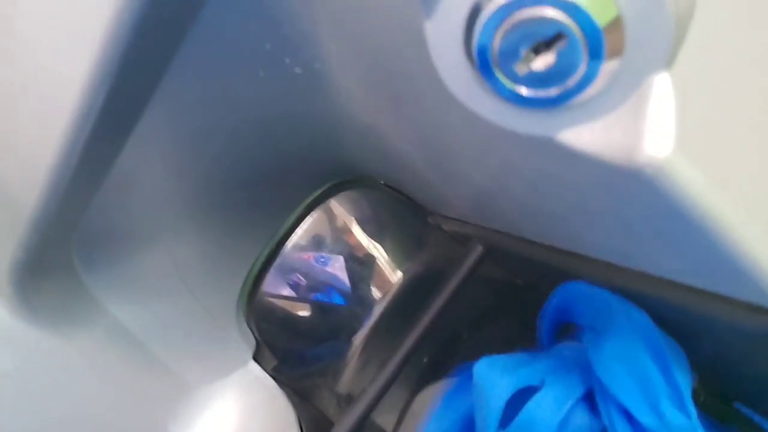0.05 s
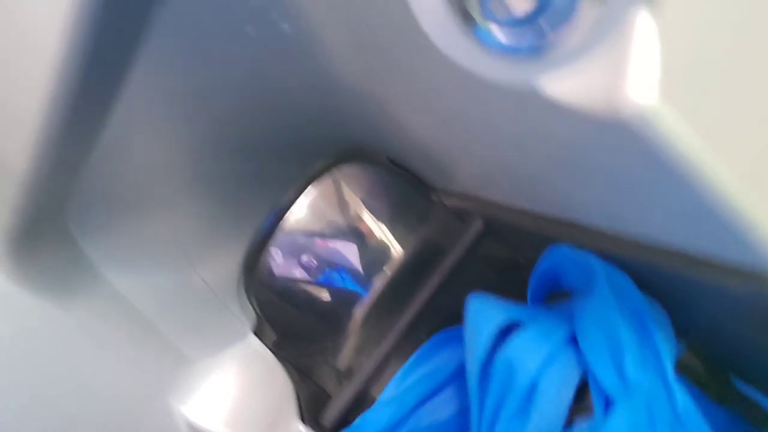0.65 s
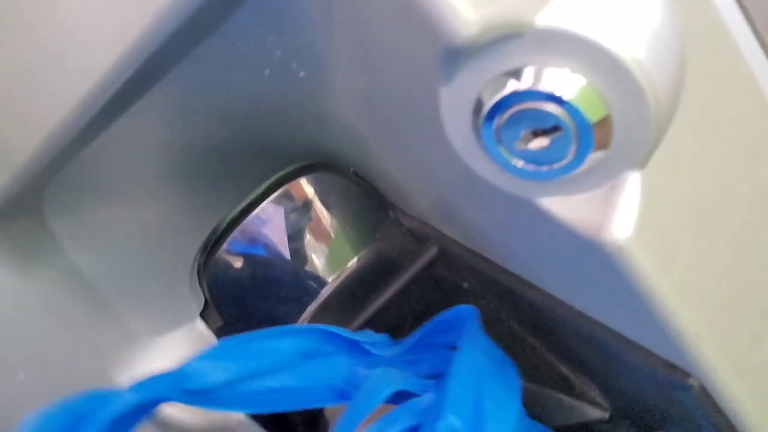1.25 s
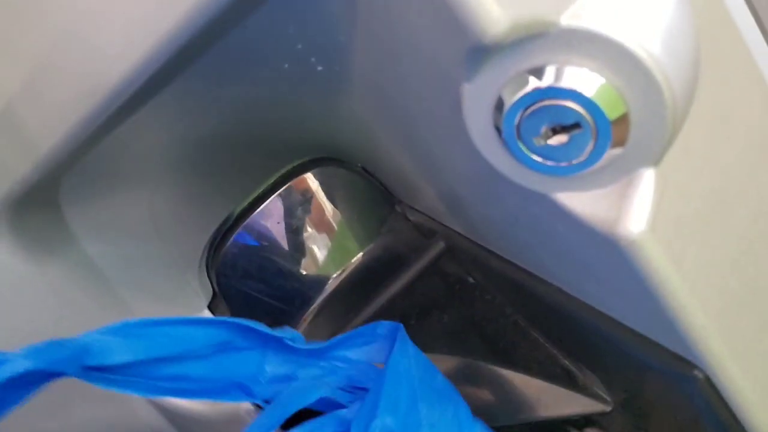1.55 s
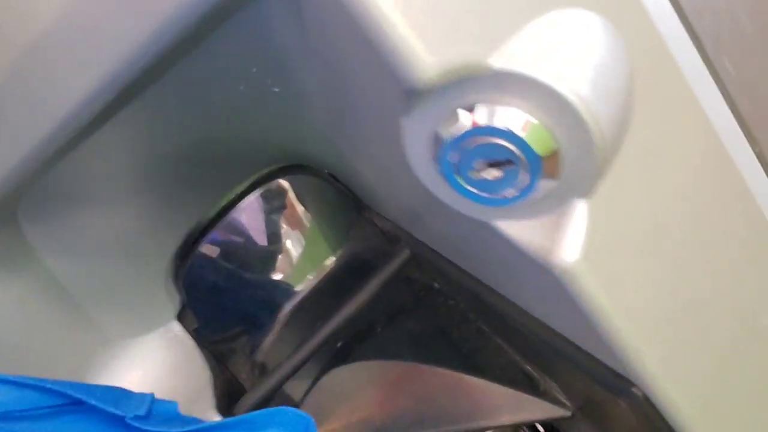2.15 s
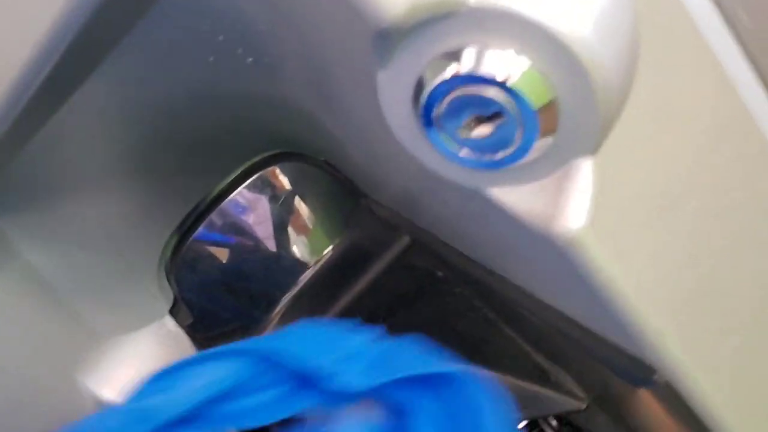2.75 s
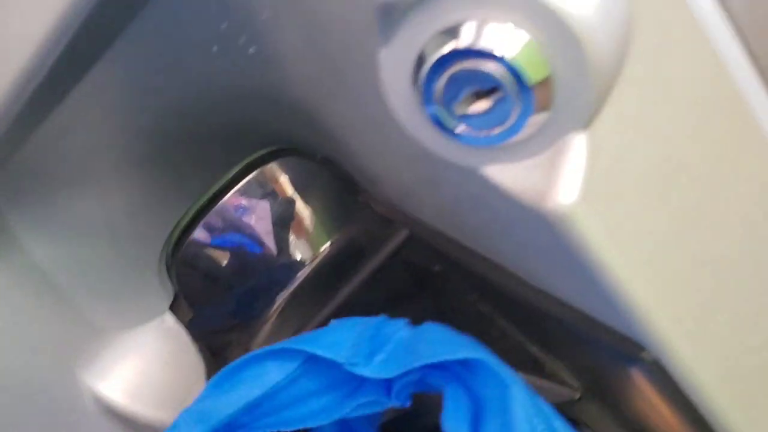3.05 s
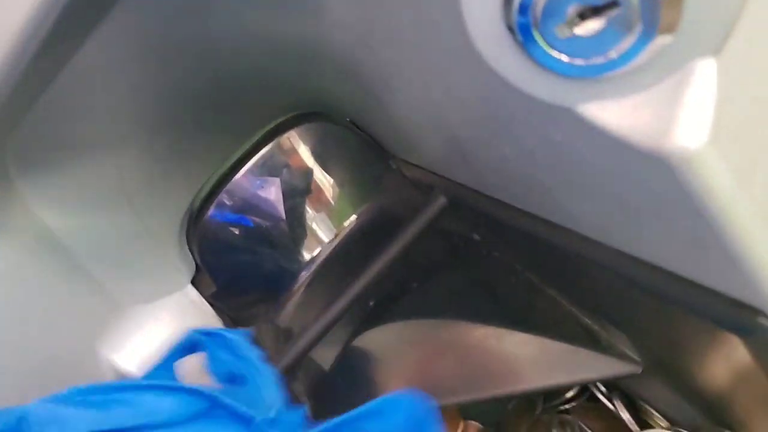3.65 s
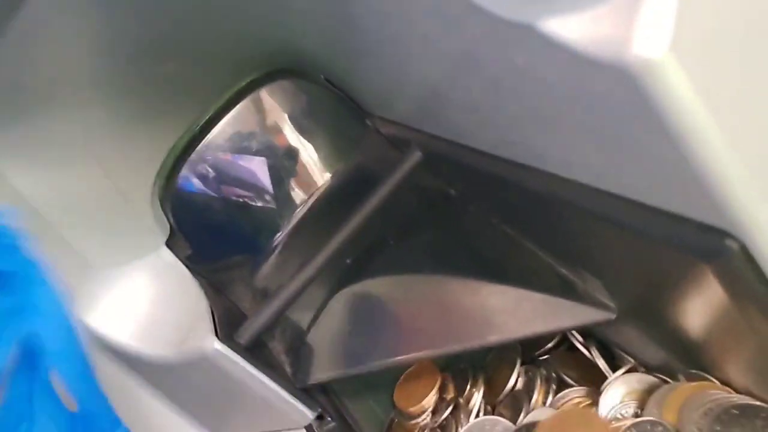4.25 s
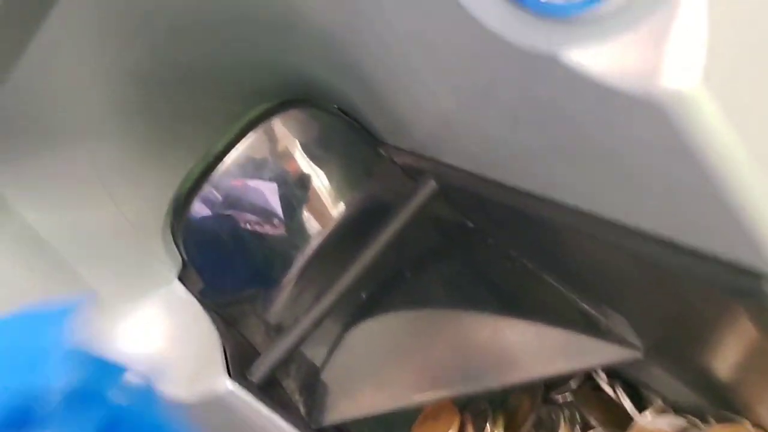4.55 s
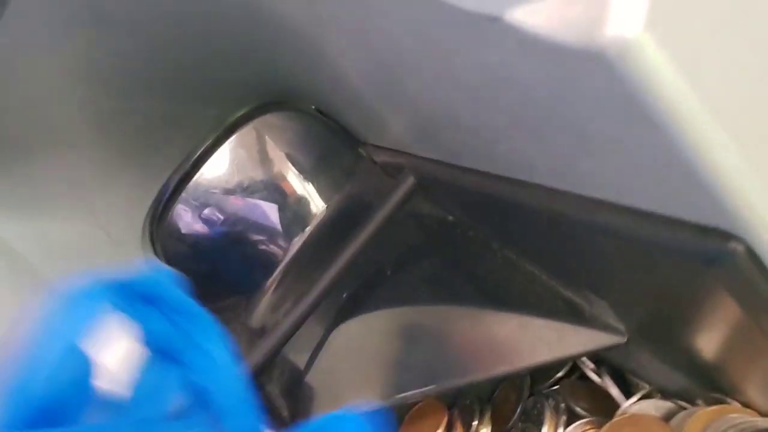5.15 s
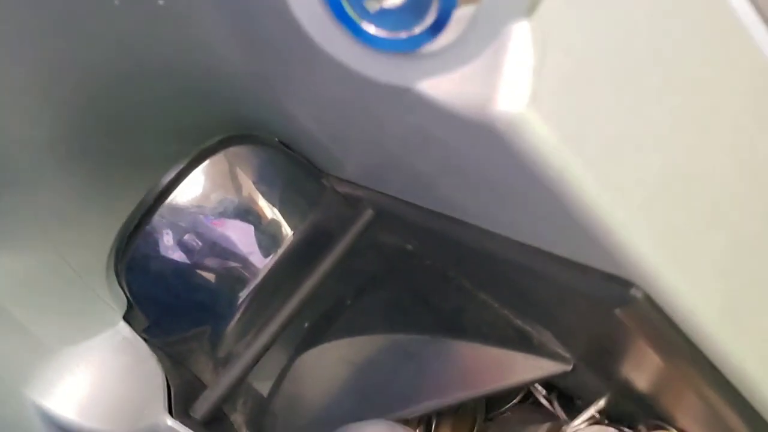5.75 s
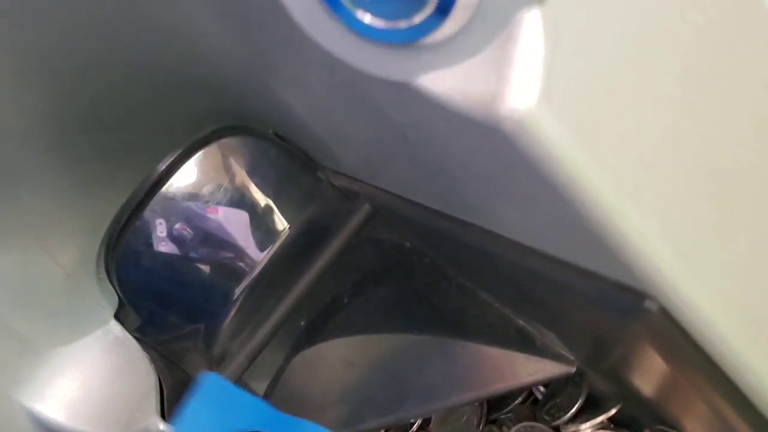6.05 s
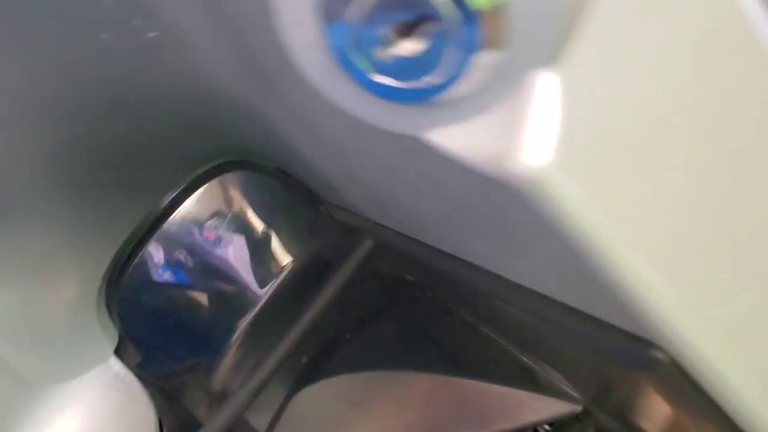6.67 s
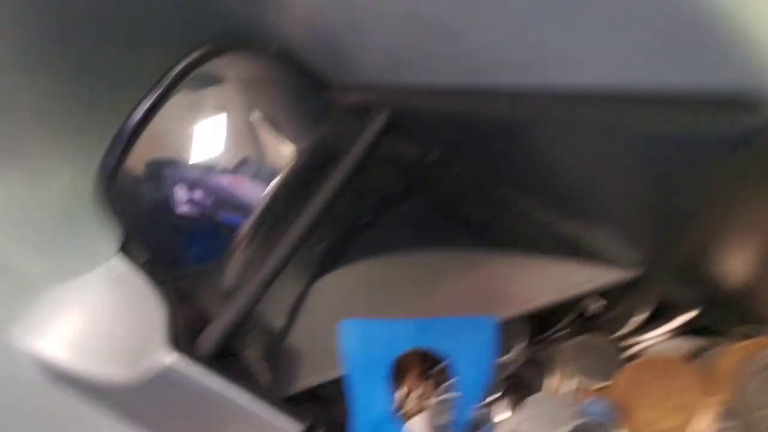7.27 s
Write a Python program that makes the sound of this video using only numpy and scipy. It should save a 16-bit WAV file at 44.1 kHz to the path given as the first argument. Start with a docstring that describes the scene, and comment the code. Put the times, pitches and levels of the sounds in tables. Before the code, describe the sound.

A hand rummages close up in a small plastic compartment over a faint, low outdoor hum. From the start, thin plastic and a cloth strap rustle in uneven strokes while coins jingle brightly beneath them. At 1.3 seconds the heap is shoved across the hollow tray, which scrapes, groans briefly with friction and takes a quick flurry of knocks from about 2 to 2.6 seconds. Rustling and small clinks continue, and a second, lighter flurry of knocks runs from 3.6 to 4.3 seconds. Around 5 seconds, creases in the plastic snap in a run of bright ticks. A last strong shove comes from 5.4 to 6 seconds with scraping, jingling and more knocks, followed by a hard, dry coin click at 6.1 seconds. The handling then thins to light rustles and dull bumps, with a final plastic snap just after 7 seconds.

```python
"""Close up, a hand rummages in a small plastic compartment over a low outdoor hum. First, thin plastic
and a cloth strap rustle while coins jingle under them. From 1.3 s the heap is shoved across the hollow
tray, which scrapes, groans and takes a flurry of knocks; a second flurry follows at 3.6 s. Creases in
the plastic snap in a run around 5 s, then come a last shove, more knocks and a hard coin click at 6.1 s.
It all thins out to rustles, dull bumps and a final snap."""
import sys
import numpy as np
from scipy import signal
from scipy.fft import rfft, irfft
from scipy.io import wavfile
from scipy.ndimage import uniform_filter1d

SR = 44100
rng = np.random.default_rng(int(sys.argv[2]) if len(sys.argv) > 2 else 0)


def master_out(mix):
    """Clip the mix to full scale and print it as 16-bit PCM to the path in sys.argv[1]."""
    frames = np.transpose(np.atleast_2d(mix))
    ceiling = np.clip(frames, -1, 1)
    pcm = np.round(ceiling * 32767).astype(np.int16)
    wavfile.write(sys.argv[1], SR, pcm)


N = 322371
TIME = np.arange(N) / SR
BINS = np.fft.rfftfreq(4096, 1 / SR)

# Cue levels are faders ahead of panning and EQ; "fall" is the time to drop 20 dB.
# EQ of the outdoor bed: f/Hz, level/dB
HUM_EQ = [(20, -37), (40, -4.5), (58, 5), (85, -13), (130, -6.5), (230, -7), (400, -8.5), (900, -21.5),
          (2000, -46), (6000, -41), (16000, -43.5)]
# EQ of the dull handling noise: f/Hz, level/dB
BUMP_EQ = [(30, -18), (70, -2.5), (140, -4.5), (230, 2.5), (330, -6.5), (600, -18), (2000, -56)]
# hand and strap bump the housing: t/s, rise/s, hold/s, fall/s, level/dB
HOUSING_BUMPS = [(.49, 0.091, 0.52, 6, -59.5), (1.98, 0.0333, 0.035, 0.66, -42.5),
                 (2.7, .2, 0.66, 0.7, -56.5), (3.57, 0.031, 0.024, 1.5, -51), (4.4, 0.13, 0.32, 0.7, -53.5),
                 (4.94, 0.089, .1, 1.6, -50.5), (5.18, 0.054, .35, .5, -50.5),
                 (5.417, 0.0123, .02, 0.17, -46), (6.46, 0.104, .03, .15, -51),
                 (6.83, 0.0245, 0.167, .34, -55.5), (7.105, .06, 0.109, 2.06, -48)]
# resonances of the hollow tray: f/Hz, width/Hz, level/dB, lag of the right port/rad
TRAY_RESONANCES = [(355.5, 14, 12.5, 0.058), (458, 73, 10, 0.33), (521, 47, 6, 0.13), (638.4, 55, 4, 0.35),
                   (805, 51, 6, 2.08), (1066, 247, 6, 2.47), (1269.3, 103, 11.5, 0.9),
                   (1380, 127, 1.5, 0.56), (1795, 85.7, 2, 0.965), (2209, 34, 6.5, 3.43),
                   (2422, 17.8, 2, 0.91), (2815, 57, 2, 1.23), (3294, 25, -2.5, 0.46), (4540, 35, 6, 1.6)]
# the rubbed tray floor groans: t/s, rise/s, hold/s, fall/s, level/dB, f/Hz
FLOOR_GROANS = [(1.466, 0.0325, 0.048, 0.4, -48.5, 480), (2.031, 0.034, 0.18, 0.15, -40.5, 460),
                (3.388, 0.035, 0.045, 0.25, -50, 573), (3.588, 0.026, 0.045, 0.29, -46, 480)]
# EQ of the heap scraping the floor: f/Hz, level/dB
SCRAPE_EQ = [(25, -54.5), (60, -26.5), (250, -16), (500, -3.5), (850, 1.5), (1300, -5), (1700, -0.5),
             (3000, -0.5), (5000, -7), (8000, -26), (16000, -47.5)]
# shoves that move the whole heap: t/s, rise/s, hold/s, fall/s, level/dB
HEAP_SHOVES = [(0.0, .055, .05, .45, -50.5), (1.313, .21, .03, .43, -35.5), (1.708, .07, .23, .5, -46),
               (1.99, .16, .11, .08, -34), (2.3, .04, .03, .05, -34.5), (2.39, .02, .015, .05, -32),
               (2.45, .025, .1, .09, -35), (3.586, .037, .05, .1, -45), (3.725, .03, .07, .13, -39),
               (3.91, .09, .21, .32, -41), (4.391, .033, .1, .2, -51), (4.505, .035, .12, .1, -54),
               (5.431, .23, .25, .23, -37)]
# knocks on the tray: t/s, midrange level/dB, low thud/dB, hard edge/dB, f/Hz of the struck spot
TRAY_KNOCKS = [(0.066, -35.5, -15, -21, 1180), (1.268, -43, -6, -6, 800), (1.486, -35, -1, -6, 800),
               (1.513, -26, -5, 0.5, 4820), (2.034, -25.5, -9, -2, 1200), (2.059, -26.5, 3.5, -27.5, 1200),
               (2.086, -25.5, -6, -22, 1240), (2.117, -25.5, -11, 2, 1220), (2.171, -24.5, 0, -26, 1280),
               (2.185, -25, -2.5, -17, 1200), (2.208, -23.5, -10, -1, 1200), (2.247, -17.5, -10, 0, 1384),
               (2.26, -26, -13.5, -1, 1270), (2.332, -29, -1.5, 6, 4530), (2.36, -24, -25, 0, 3840),
               (2.404, -21.5, -2, 0, 1200), (2.465, -21, -6, -3.5, 1403), (2.476, -24, -31.5, 1, 2800),
               (2.487, -24, -17.5, -8, 1270), (2.512, -23.5, -32, -4, 1250), (2.534, -22, -28, -4.5, 1180),
               (2.574, -26.5, -27, 1, 1330), (2.763, -42, -22, -20.5, 1300), (2.835, -37, -39.5, -21, 1305),
               (2.853, -42, -21, -13.5, 1210), (3.621, -38, 9, -8, 1200), (3.659, -31, -4, -2, 1260),
               (3.687, -30.5, -25, -1, 1840), (3.765, -30.5, -8.5, 1.5, 1370),
               (3.805, -32.5, -17.5, 4.5, 990), (3.835, -33.5, 4, 5.5, 4460), (4.016, -33, -17, 0, 1230),
               (4.059, -27, -32, -2.5, 1040), (4.094, -28.5, -17, -12.5, 1190), (4.108, -32, -15, -4, 1210),
               (4.145, -29.5, -27.5, -6, 1210), (4.201, -28.5, -12, -4, 3870),
               (4.221, -28.5, -13, -2, 1790), (4.32, -26.5, -15, -3.5, 1028), (5.578, -33, -8.5, -3, 1200),
               (5.645, -22.5, -14, 3, 1210), (5.7, -27, -30, 10, 4390), (5.713, -23, -7.5, 5, 4460),
               (5.73, -23.5, -26.5, 3, 965), (5.742, -24, -3, 2, 1190), (5.803, -24, -33, -1.5, 947),
               (5.8675, -20, -4, 3.5, 1300), (5.9002, -22.5, -12.5, 0, 4000), (5.961, -34.5, -11, 5, 3320),
               (6.038, -36, -8, -1.5, 1130), (6.119, -38.5, -10.5, 1, 1090), (6.973, -39.5, -25, -8, 1050)]
# creased plastic snaps: t/s, level/dB, body/dB
CREASE_SNAPS = [(0.2985, -31, -22), (0.917, -35, -25), (1.1284, -28, -23.5), (1.2494, -31, -23),
                (1.77, -17, -17), (2.742, -29.5, -17), (3.3797, -22, -26), (3.39, -24.5, -24),
                (4.2016, -21, -11), (4.52, -29, -1), (4.7947, -26, -24), (4.8646, -24.5, -23),
                (4.9005, -23.5, -26), (4.9777, -29, -3), (5.0179, -22.5, -19), (5.0693, -29, -15),
                (5.112, -26, -18), (5.233, -34, -18), (5.426, -27, -18), (5.504, -25, -19.5),
                (6.082, -33, -25.5), (6.275, -30.5, -3.5), (6.286, -33, -12), (6.3176, -30, -7),
                (6.345, -33.5, -2), (6.4316, -29.5, -31), (7.0473, -34.5, -25.5), (7.1192, -34, -29),
                (7.1318, -21, -24)]
# a coin drops flat onto another and clicks: t/s, relative level/dB
COIN_CLACKS = [(0.334, -21), (1.6106, -29.5), (6.0556, -25), (6.1187, -11.5), (6.1235, -24), (6.2765, -27)]
# single coins ring out: t/s, level/dB, f/Hz
COIN_CLINKS = [(0.2983, -33.5, 11400), (0.3754, -32, 11400), (0.7262, -34.5, 11300), (0.7992, -33, 11210),
               (1.2485, -28, 15700), (1.3665, -29, 11300), (1.9294, -23, 13600), (1.995, -27, 13950),
               (2.1136, -19, 12700), (2.7133, -33, 11590), (2.865, -35, 13030), (2.965, -34, 11320),
               (3.0983, -26, 15460), (3.5294, -31, 15300), (3.6794, -30, 15400), (3.7494, -33, 15500),
               (4.2344, -28, 15500), (4.2944, -25, 10500), (4.3085, -27, 15160), (4.3994, -26, 11380),
               (4.625, -38, 11530), (4.7765, -29, 11400), (5.809, -22, 12800), (5.8696, -27, 11280),
               (5.9244, -33.5, 13900), (5.9544, -31.5, 13600), (5.9902, -29, 14000), (6.038, -29, 14050),
               (6.0795, -39, 15600), (6.1184, -33, 13950), (6.4515, -38, 12700)]
# EQ of rims clashing: f/Hz, level/dB
CLASH_EQ = [(3000, -25.5), (7000, -15), (9000, 0), (11300, 1.5), (13000, 1), (14700, 1.5), (15700, 0.5)]
# ring of the coins in the heap: f/Hz, relative level/dB
HEAP_MODES = [(9250, -6), (11330, 2.5), (11560, -2), (12760, 3), (13800, 2.5), (15520, 5)]
# EQ of sliding plastic and cloth: f/Hz, level/dB
RUSTLE_EQ = [(200, -33.5), (700, -10), (1600, -14.5), (2500, -14), (4000, -6.5), (5600, -0.5), (7500, 1.5),
             (9500, -3.5), (12000, -0.5), (16000, -5)]
# strokes of the hand: t/s, rise/s, hold/s, fall/s, rustle level/dB, jingle level/dB, left over right/dB
HAND_STROKES = [(0.0, 0.00073, 0.14, 0.18, -33.5, -29, 0), (0.304, 0.068, 0.0283, 0.041, -43, -42, -1),
                (0.393, 0.16, 0.047, 0.73, -37.5, -40, -0.5), (0.66, 0.0206, 0.09, 0.15, -39.0, -34, 0),
                (0.945, 0.132, 0.26, 0.65, -38.0, -40.5, 0), (1.252, 0.277, 0.063, 0.35, -26.5, -24, 1),
                (1.712, 0.027, 0.103, 2, -32.5, -33.0, 2), (1.831, 0.26, 0.4, 0.27, -32.0, -28.5, 0.5),
                (2.172, 0.027, 0.214, 0.26, -33.5, -33.5, 1.0),
                (2.698, 0.034, 0.0276, 0.1, -37.5, -37, -1.0), (2.828, 0.161, 0.24, 0.213, -39, -43, -1.0),
                (3.153, 0.085, 0.016, 0.12, -32, -33.5, -0.5),
                (3.271, 0.0675, 0.0188, 0.1, -35.0, -38.5, -0.5),
                (3.364, 0.027, 0.23, 0.35, -32.5, -29.0, 1.5),
                (3.544, 0.041, 0.26, 0.3032, -33.5, -29, 1.5), (3.956, 0.136, 0.15, 0.1981, -31, -31, 0.5),
                (4.346, 0.054, 0.115, 0.0766, -33.5, -33.5, 0.0),
                (4.53, 0.035, 0.0656, 0.8, -43.5, -49.0, -0.5),
                (4.671, 0.119, 0.017, 0.049, -38.5, -36, -1.5), (4.833, 0.0865, 0.013, 0.05, -35.0, -32, 1),
                (5.001, 0.01, 0.1086, 0.103, -35.5, -40.5, 1), (5.214, 0.09, 0.03, 0.476, -34.5, -38, 0.0),
                (5.461, 0.075, 0.171, 0.06, -28.5, -31.5, 0.0),
                (5.576, 0.061, 0.23, 0.2667, -32.5, -27.5, -0.5),
                (5.932, 0.027, 0.076, 0.5, -49.0, -57, -1), (6.19, 0.064, 0.07, 0.33, -45, -48.5, -1.0),
                (6.45, 0.011, 0.012, 0.034, -49.5, -47, -2.5), (6.49, 0.089, 0.032, 0.29, -31.5, -34.5, 0),
                (6.825, 0.036, 0.1035, 0.28, -44.5, -49.5, -2.0),
                (7.102, 0.0178, 0.099, 0.23, -44.5, -59.5, -2.5)]
# stereo width, narrow where long waves reach both ports alike: f/Hz, side level/dB
SIDE_EQ = [(60, -9.5), (260, -12.5), (560, -7.5), (760, -5.5), (1200, -1.5), (16000, 0)]
# shading of the two microphone ports: f/Hz, left level/dB, right level/dB
PORT_EQ = [(317, 0, 2), (1248, 3, -1.5), (2870, 6, 3), (6115, 4.5, -1), (7430, -9.5, 2.5), (8330, 0, -0.5),
           (10850, 2, -0.5), (11750, -1, 5.5), (12960, -1.5, -0.5), (16000, 1, 2)]


def amp(db):
    """Decibels to gain."""
    return 10 ** (np.asarray(db) / 20)


def unit(x):
    """Scales to an rms of one."""
    return x / np.sqrt(np.mean(x ** 2) + 1e-20)


def loudest(x):
    """Rms of the loudest millisecond."""
    return np.sqrt(uniform_filter1d((x ** 2).mean(0), 44).max())


def curve(table, column=1):
    """EQ breakpoints joined into a dB curve over all bins."""
    columns = np.transpose(table)
    return np.interp(np.log(BINS + 1), np.log(columns[0] + 1), columns[column])


def colour(x, db):
    """Minimum-phase EQ, so attacks get no pre-ring."""
    cepstrum = irfft(np.log(amp(db)))
    half = len(cepstrum) // 2
    cepstrum[1:half] *= 2
    cepstrum[half + 1:] = 0
    taps = irfft(np.exp(rfft(cepstrum)))
    return signal.oaconvolve(x, taps[None], axes=1)[:, :x.shape[1]]


def add(mix, s, sound):
    """Drops a stereo sound into the mix at s seconds."""
    part = mix[:, max(round(s * SR), 0):][:, :sound.shape[1]]
    part += sound[:, :part.shape[1]]


def gesture(start, rise, hold, fall):
    """Envelope of one movement: it gathers speed, keeps it, and dies away."""
    t = TIME - start
    return np.clip(t / rise, 0, 1) * amp(-20 * np.maximum(t - rise - hold, 0) / fall)


def effort(table, column=4):
    """Power sum of overlapping movements, with their levels from one column."""
    return np.sqrt(sum((amp(row[column]) * gesture(*row[:4])) ** 2 for row in table))


def uneven(depth_db, size=1500):
    """Gain that wanders as the load catches and lets go."""
    drift = uniform_filter1d(uniform_filter1d(rng.standard_normal(N), size), size)
    return amp(depth_db * unit(drift))


def contacts(per_s, spread_db):
    """Random train of tiny impacts: many weak, a few strong."""
    return (rng.random(N) < per_s / SR) * amp(spread_db * np.minimum(rng.exponential(1, N), 4))


def grains(per_s, spread_db, decay_s, smooth):
    """Each contact scatters round the compartment as a short burst, over a share of smooth sliding."""
    power = signal.lfilter([1], [1, -np.exp(-2 / (decay_s * SR))], contacts(per_s, spread_db) ** 2)
    return unit(np.sqrt(power / power.mean() + smooth) * rng.standard_normal((2, N)))


def burst(decay_s, tail_db, tail_s):
    """One sharp contact and its quickly dying reflections."""
    t = TIME[:6000]
    envelope = np.exp(-t / decay_s) + amp(tail_db) * np.exp(-t / tail_s)
    return envelope * rng.standard_normal((2, len(t)))


def hum():
    """The bed: a steady, distant outdoor hum of dark noise."""
    return amp(-58) * unit(colour(rng.standard_normal((2, N)), curve(HUM_EQ)))


def bumps(hand, jostle_db=-20):
    """Hand and strap bump dully on the housing; every stroke jostles the strap too."""
    thumps = grains(per_s=70, spread_db=0, decay_s=0.0067, smooth=0.94)
    return unit(colour(thumps, curve(BUMP_EQ))) * np.hypot(effort(HOUSING_BUMPS), amp(jostle_db) * hand)


def tray(contact):
    """The dry contact plus the ring of the wall it pushes on."""
    t, ring = TIME[:4096], np.zeros((2, 4096))
    for hz, width, db, lag in TRAY_RESONANCES:
        swing = np.sin(2 * np.pi * hz * t - np.array([[0], [lag]]))
        ring += amp(db) * 2 * np.pi * width / SR * np.exp(-np.pi * width * t) * swing
    return contact + signal.oaconvolve(contact[:1], ring, axes=1)[:, :contact.shape[1]]


def groans(half_width_hz=85.5):
    """Under firm pressure the slips feed one low resonance of the tray floor."""
    out = np.zeros((2, N))
    slips = grains(per_s=260, spread_db=5.5, decay_s=0.0029, smooth=0.57)
    for *timing, db, hz in FLOOR_GROANS:
        peak_db = -20 * np.log10(1 + ((BINS - hz) / half_width_hz) ** 2)
        out += amp(db) * gesture(*timing) * unit(colour(slips, peak_db))
    return out


def scrape(hand, rub_db=-19):
    """The shoved heap sticks and slips, ringing the tray; every stroke adds a light rub."""
    slips = grains(per_s=260, spread_db=4, decay_s=0.00232, smooth=0.9)
    push = np.hypot(effort(HEAP_SHOVES), amp(rub_db) * hand)
    return unit(tray(colour(slips, curve(SCRAPE_EQ)))) * push


def knocks():
    """Heavier blows on the tray wall, from soft thuds to hard raps; each spot has its own pitch."""
    out = np.zeros((2, N))
    hollow = signal.butter(2, [700, 2500], "bandpass", fs=SR, output="sos")
    for s, db, thud, edge, hz in TRAY_KNOCKS:
        lows = [(20, thud - 23.5), (70, thud - 23), (330, thud - 0.5)]
        mids = [(600, -5.5), (1000, 4.5), (1300, -2.5), (1900, 3)]
        highs = [(2900, edge + 2.5), (4500, edge + 1), (6000, edge + 0.5),
                 (9000, edge - 27), (16000, edge - 35.5)]
        spot_db = 5 / (1 + ((BINS - hz) / 150) ** 2)
        hit = burst(decay_s=0.0022, tail_db=-7, tail_s=0.0166)
        blow = tray(colour(hit, curve(lows + mids + highs) + spot_db))
        add(out, s, amp(db) * blow / loudest(signal.sosfilt(hollow, blow)))  # force sets the hollow mids
    return out


def snaps():
    """Creases in the plastic flip over with a bright tick."""
    out = np.zeros((2, N))
    for s, db, body_db in CREASE_SNAPS:
        eq = curve([(200, body_db + 6), (2500, body_db + 4.5), (6500, 4), (12000, 7.9), (16000, 2.5)])
        tick = colour(burst(decay_s=0.0018, tail_db=-3, tail_s=0.013), eq)
        add(out, s, amp(db) * tick / loudest(tick))
    return out


def clacks(trim_db=-3):
    """A coin dropping flat onto another coin gives only a dry, very bright click."""
    out = np.zeros((2, N))
    eq = curve([(500, -29), (6000, -12), (10000, 1.5), (12800, 6), (16000, -4.5)])
    for s, db in COIN_CLACKS:
        click = colour(burst(decay_s=0.0015, tail_db=-14, tail_s=0.009), eq)
        add(out, s, amp(db + trim_db) * click / loudest(click))
    return out


def clinks(t60_s=0.15):
    """A freed coin is struck and rings in a close, beating pair of tones."""
    out, t = np.zeros((2, N)), TIME[:SR // 3]
    for s, db, hz in COIN_CLINKS:
        phase = rng.random((2, 2, 1))
        lower = np.sin(2 * np.pi * (hz * t + phase[0]))
        upper = np.sin(2 * np.pi * (1.011 * hz * t + phase[1]))
        add(out, s, amp(db) * (lower + 0.5 * upper) * amp(-60 * t / t60_s))
    return out


def jingle(coins=12, detune=0.0143, t60_s=0.089):
    """Coins clash rim on rim; each is tuned a little differently and is soon damped by the heap."""
    stir = effort(HAND_STROKES, column=5) * uneven(depth_db=1)
    rims = grains(per_s=540, spread_db=4.5, decay_s=0.0063, smooth=0.37)
    clash = unit(colour(rims, curve(CLASH_EQ)))
    ring, t = np.zeros((2, N)), TIME[:SR // 8]
    for hz, db in HEAP_MODES:
        for offset in np.linspace(-1, 1, coins):
            pitch = hz * (1 + detune * (offset + 0.185 * rng.standard_normal()))
            mode = np.sin(2 * np.pi * (pitch * t + rng.random((2, 1)))) * amp(-60 * t / t60_s)
            mode /= np.linalg.norm(mode[0])
            blows = unit(contacts(per_s=30, spread_db=5)) * stir
            ring += amp(db) * signal.oaconvolve(blows[None], mode, axes=1)[:, :N]
    return amp(1.46) * clash * stir + amp(-11.6) * ring / np.sqrt(coins)


def rustle(hand, rest_db=-54):
    """Plastic and cloth slide in countless small slips; the hand never quite rests."""
    slips = grains(per_s=900, spread_db=3.5, decay_s=0.0049, smooth=0.79)
    motion = np.hypot(hand, amp(rest_db)) * uneven(depth_db=0.85)
    return unit(colour(slips, curve(RUSTLE_EQ))) * motion


def scene():
    """The bright layers pan with the hand; the tray and the bed stay put."""
    hand = effort(HAND_STROKES)
    start, rise, *_, place_db = np.transpose(HAND_STROKES)
    pan_db = np.interp(TIME, start + rise, place_db) * np.array([[0.5], [-0.5]])
    bright = (rustle(hand) + jingle() + clinks() + clacks() + snaps()) * amp(pan_db)
    return bright + scrape(hand) + groans() + knocks() + bumps(hand) + hum()


def record(dry):
    """Two microphone ports share the bass and shade the treble differently; then a steep high cut."""
    mid = dry.mean(0)
    side = colour((dry[:1] - dry[1:]) / 2, curve(SIDE_EQ))
    left = colour(mid + side, curve(PORT_EQ))
    right = colour(mid - side, curve(PORT_EQ, column=2))
    high_cut = signal.firwin(801, cutoff=15790, window=("kaiser", 8), fs=SR)
    return signal.oaconvolve(np.vstack([left, right]), high_cut[None], "same", axes=1)


dry = scene()
out = record(dry)
master_out(out)
```